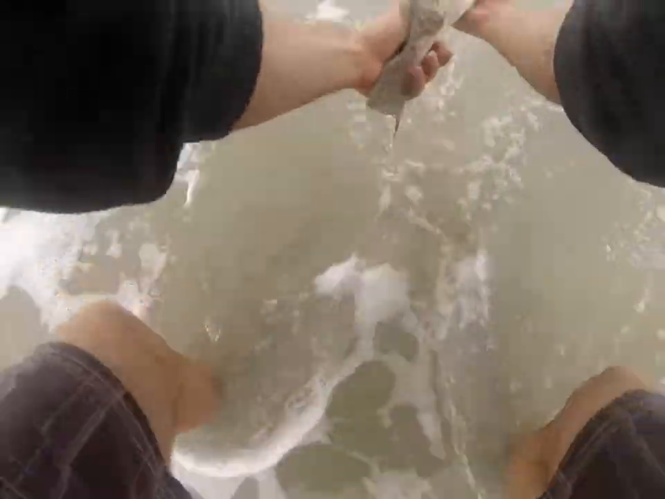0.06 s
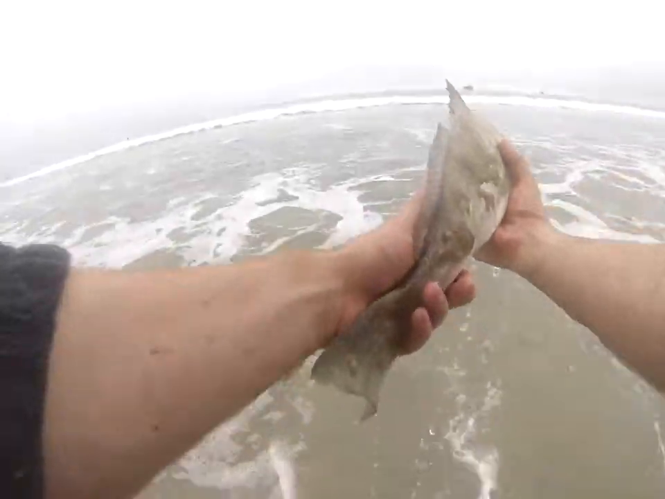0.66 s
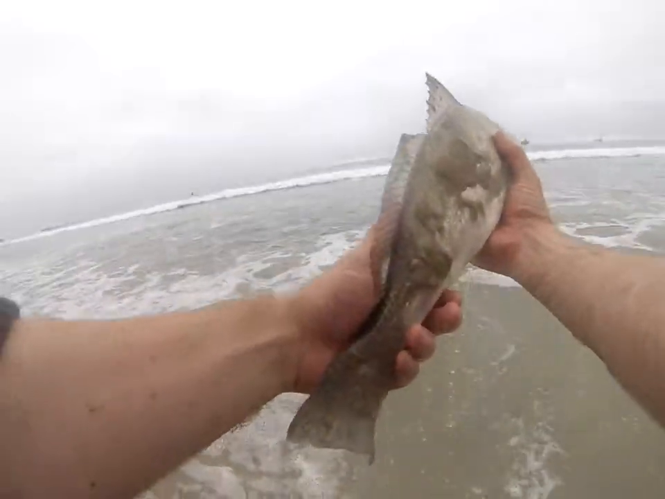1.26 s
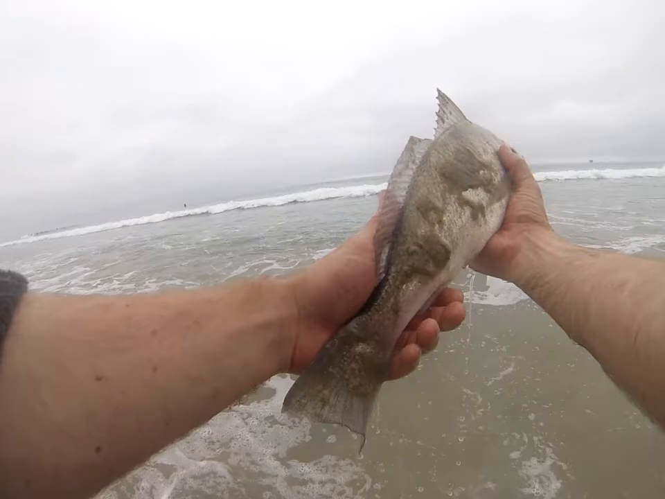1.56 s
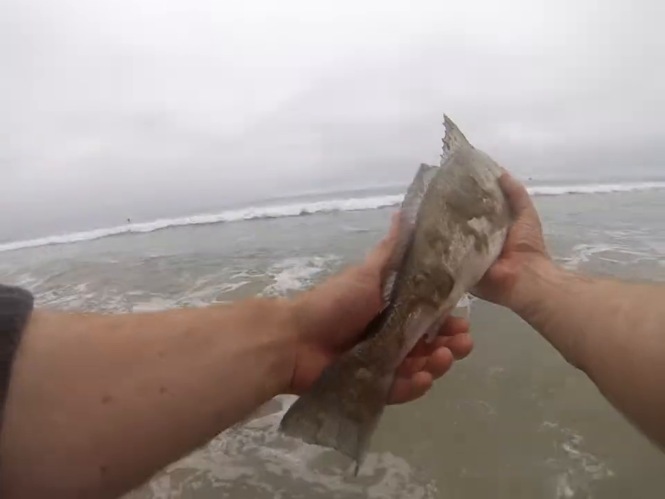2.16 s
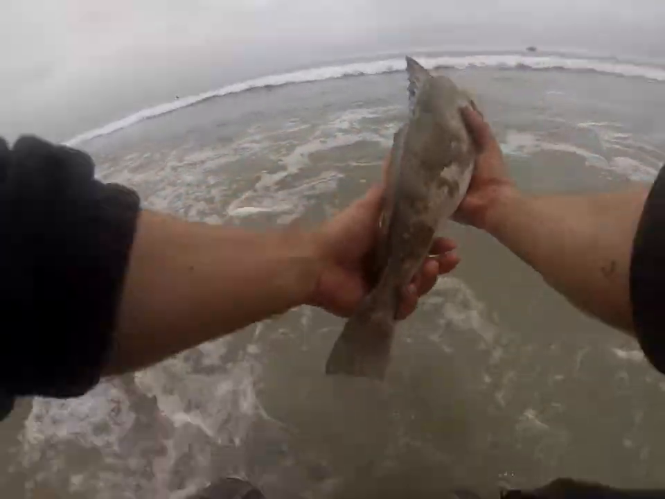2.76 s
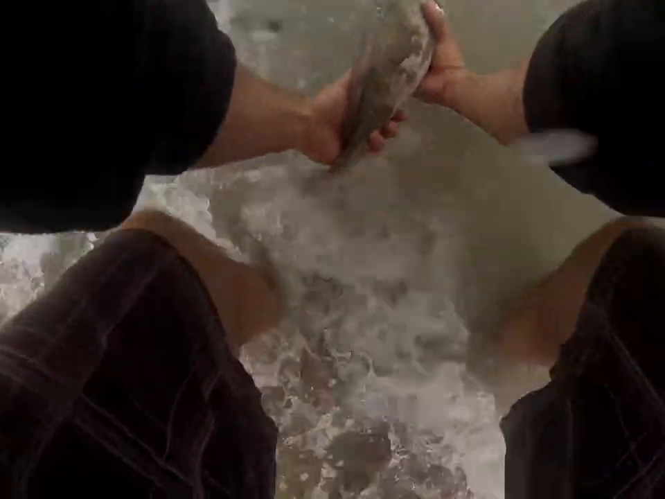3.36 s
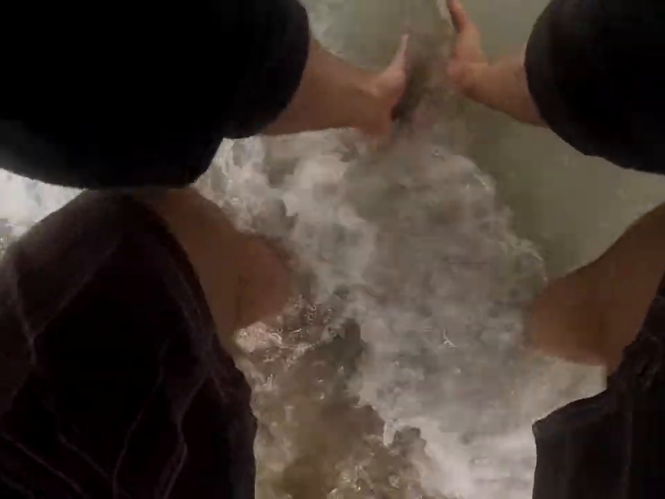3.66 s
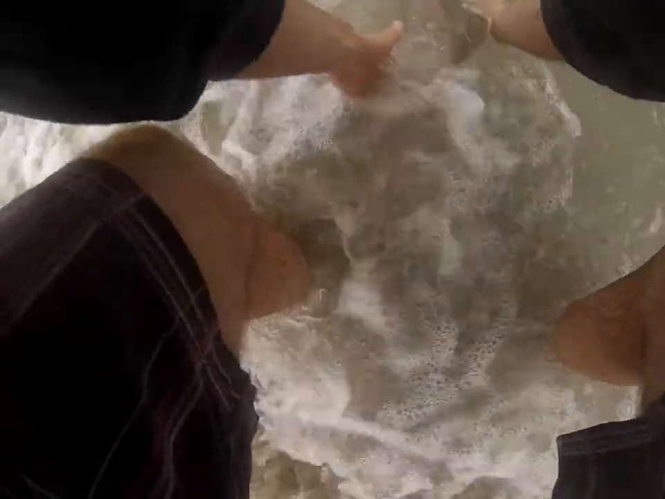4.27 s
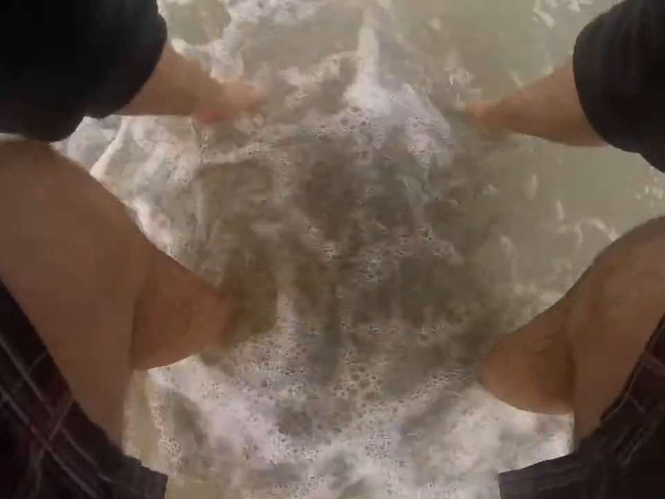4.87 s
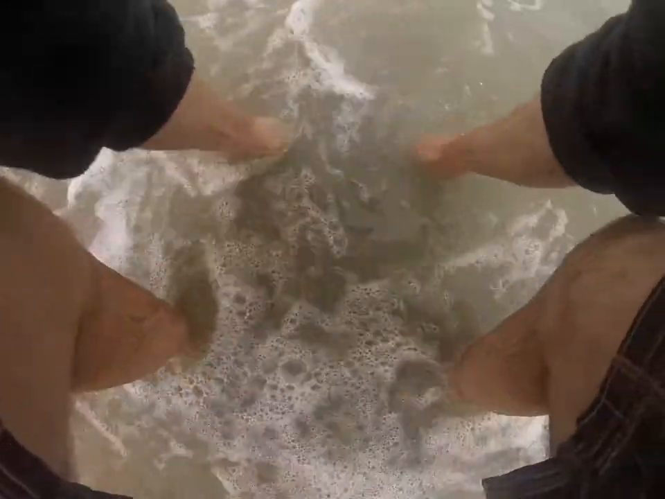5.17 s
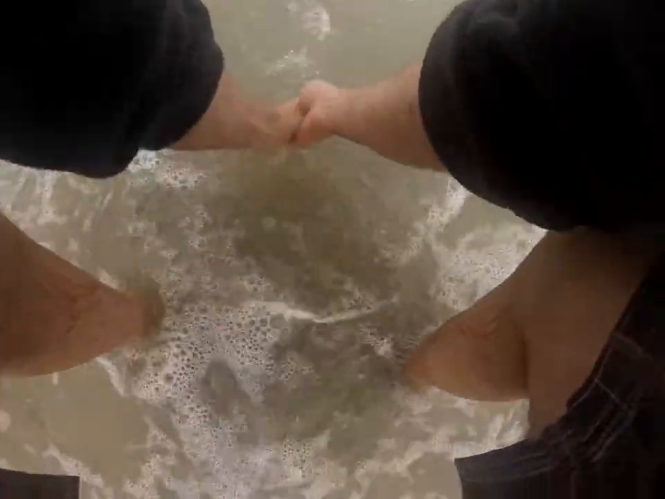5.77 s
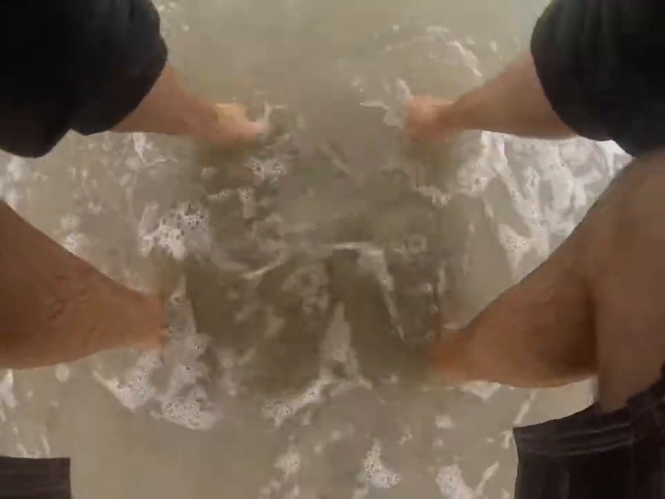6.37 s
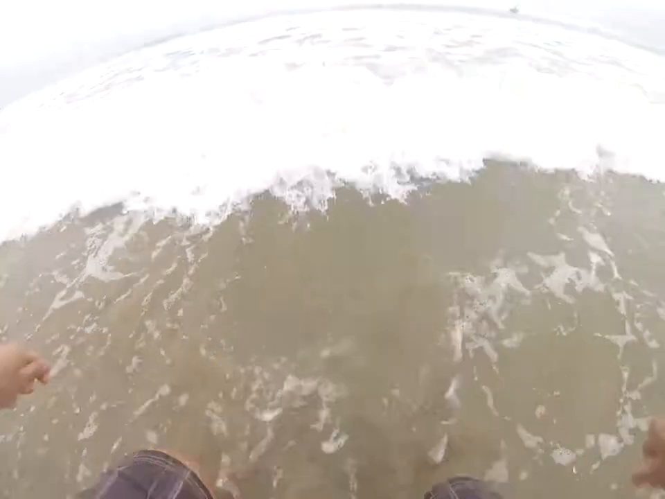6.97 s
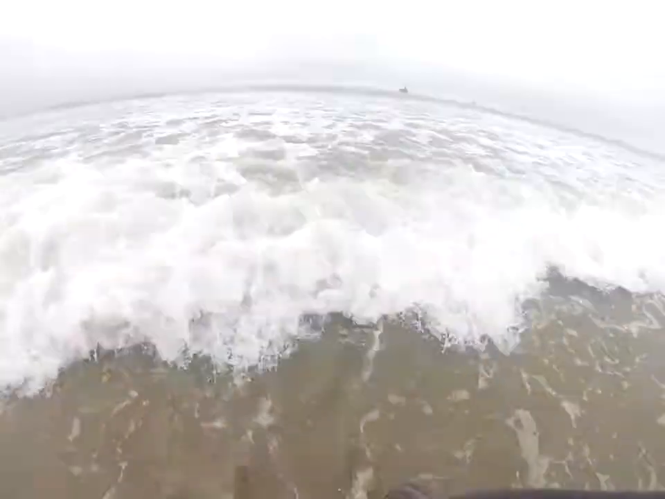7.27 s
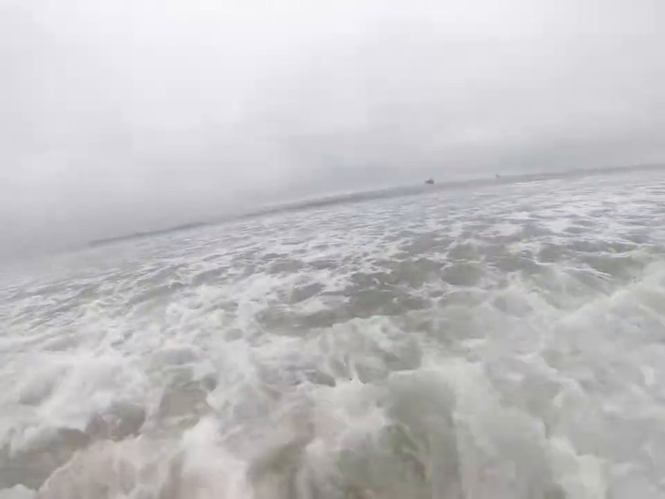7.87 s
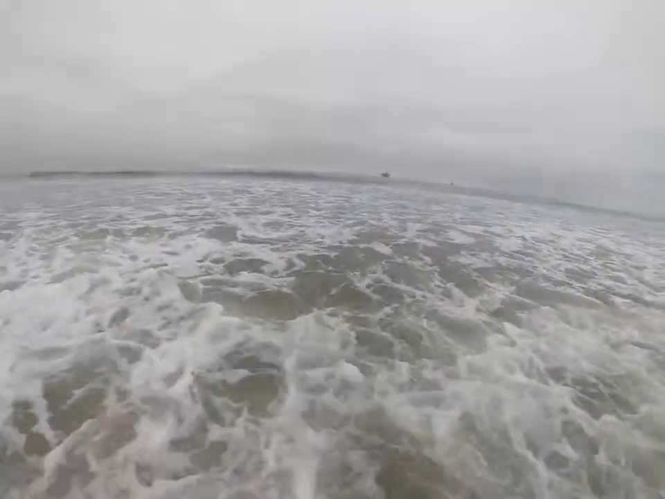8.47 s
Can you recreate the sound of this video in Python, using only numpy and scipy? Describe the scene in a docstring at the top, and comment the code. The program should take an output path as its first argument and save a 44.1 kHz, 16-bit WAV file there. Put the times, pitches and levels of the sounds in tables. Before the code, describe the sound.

A chest-worn camera clicks and thumps in its mount over the soft rush of shallow surf. The water swells into bubbling, hissing foam, then eases, with light drips from wet hands. Another sharp click starts a run of dull knocks and low strap rubbing as a nearby wave tumbles in with a roar and fizz. Everything sounds close and slightly boxy through the plastic housing.

```python
"""Shallow surf, heard by a wader through a chest-strapped camera in a waterproof plastic case.
Far breakers roar; a wave foams round the legs, the wader stoops, a second wave breaks close by.
Water is bubble clouds over rushing noise, its foam and fizz coloured by the case; drops ring as bubbles.
As the body bends, the mount slips and clicks, the straps rub, and the case rattles and thumps."""
import sys
import numpy as np
from scipy import signal
from scipy.fft import rfft, irfft
from scipy.io import wavfile
from scipy.ndimage import uniform_filter1d

SR = 44100
rng = np.random.default_rng(int(sys.argv[2]) if len(sys.argv) > 2 else 0)


def dump_mix(stems):
    """Bounce the given channels to the path in sys.argv[1] as a 16-bit WAV at rate SR."""
    frames = np.atleast_2d(stems).T  # one column per channel
    limited = np.clip(frames, -1, 1)  # hard clip at full scale
    pcm = np.round(limited * 32767).astype(np.int16)
    wavfile.write(sys.argv[1], SR, pcm)


N = 380141
T = np.arange(N) / SR
FREQS_HZ = np.arange(N // 2 + 1) * SR / N

# waves at the legs: arrival/s, rise/s, hold/s, ebb/s, foam/dB, fizz/dB, churn/dB
SURF_WAVES = [(0, .3, 0.36, 0.98, -56.5, -84, -60), (2.748, .4, 0.46, 0.47, -54.5, -62, -58.5),
              (3.4, .5, .55, 0.62, -44, -50.8, -52.5), (4.373, .28, 0.11, .33, -48.5, -54.5, -59.5),
              (5.183, 0.59, 2.3, 0.7, -55, -58, -61.5), (7.354, 0.68, 0.54, 0.36, -45, -50.5, -58)]
# water spectra: f/Hz, level/dB
CHURN_SPECTRUM = [(60, -32), (150, -8), (320, 1), (480, -2), (720, -7), (1000, -8.5), (1400, -5.5),
                  (3000, -37)]
FOAM_SPECTRUM = [(500, -4), (1000, -1.5), (1400, 1), (2000, 4.5), (3000, -1), (3800, -8.5), (5000, -35),
                 (9000, -45)]
FIZZ_SPECTRUM = [(2000, -14.5), (3500, 2), (4600, 3), (6200, -1.5), (8000, -4.5), (9200, -6), (12500, -9),
                 (15500, -17)]
ROAR_SPECTRUM = [(200, -30), (550, -4), (900, -4), (1270, 5.5), (1500, -9), (2000, -30), (4000, -44)]
# resonances: f/Hz, width/Hz, lift/dB
CASE_PEAKS = [(1290, 71, 5.5), (1560, 285, 10), (2100, 160, 0), (2244, 336, 11.5), (2628, 213, 9.5),
              (3033, 250, 5), (3470, 290, 6.5), (4055, 340, 5), (4820, 170, 4.5), (5290, 650, 6.5),
              (7250, 1830, 5.5), (11300, 1500, 2)]  # air and walls of the case
NEAR_PEAKS = [(1530, 380, 3), (2030, 260, -2.5), (3060, 410, 7), (4060, 270, 3.5), (7500, 1800, 3)]  # brighter foam at the legs
HOLLOW_PEAKS = [(400, 190, 3.5), (1564, 360, 4.5), (4920, 180, 7.5), (5400, 400, -0.5), (6000, 480, 4.5),
                (7650, 650, -2), (8560, 1350, 5.5), (10300, 800, -2)]  # hollow between chest, arms and water
# lean over the water: t/s, share/0-1
STOOP_SHARE = [(4.35, 0), (4.65, 1), (6.65, 1), (6.9, 0)]
# drops into the sea: t/s, f/Hz, level/dB, t60/s
SEA_PLOPS = [(0.002, 1450, -35, 0.12), (0.022, 1320, -38, 0.074), (0.035, 1500, -37, 0.054),
             (0.853, 1265, -45, 0.15)]
# drips from the hands: t/s, level/dB, f/Hz
HAND_DRIPS = [(3.534, -30, 3630), (3.877, -41, 8800), (3.989, -36, 5140), (4.455, -31, 2400),
              (5.371, -33, 2264), (5.912, -38, 6540), (5.934, -31, 2340), (6.16, -29.5, 2260),
              (6.166, -38, 6800), (6.168, -44, 12000), (6.188, -30, 3400), (6.191, -26.5, 2480)]
# mount slips a notch: t/s, level/dB, hardness/0-1
SLIPS = [(0.0493, -18, 0.46), (.087, -39, 0.4), (.125, -35.5, 0.4), (0.1645, -33.5, 0.45), (.204, -34, .22),
         (0.2941, -31, 0.38), (.341, -34.5, .45), (0.4047, -37.5, 0.47), (.586, -33.5, 0.7),
         (.615, -32, 0.5), (.6424, -34, 0.8), (.676, -37, 0.77), (0.7305, -24.5, 0), (2.7968, -39, 0.8),
         (2.8349, -32.5, 0.36), (2.8827, -41, .35), (3.2216, -35.5, 0.3), (6.785, -29.5, 0.23),
         (6.827, -18, .5), (6.8535, -32.5, .42), (6.8867, -32, .22), (7.1919, -35.5, 0.34),
         (7.3257, -28, 0.47), (7.7997, -34.5, 0.46)]
# case modes: f/Hz, decay/s, level/dB
SIDE_MODES = [(597, 0.003, -47), (860, 0.0032, -32), (1075, 0.0024, -30), (1298, 0.0018, -15.5),
              (1474, 0.0015, -14.5), (2595, 0.0018, -22.5), (3093, 0.0013, -20), (3900, 0.0013, -31.5)]  # beside the main mode
EDGE_MODES = [(6930, 0.00028, 5.5), (7400, 0.00053, 7), (7300, 0.00075, -9.5), (9630, 0.00043, -6),
              (10800, 0.00055, -9), (12300, .0003, -2.5)]  # sharp edge of a slip
THUMP_MODES = [(64, 0.0093, -7.5), (97, 0.012, 2), (124, 0.004, 3.5)]  # case on its strap, low
KNOCK_MODES = [(217.6, 0.00594, 5.5), (302, 0.0032, 5.5), (420, 0.003, -11.5), (559, 0.0036, -7)]  # case on its strap, mid
# handling spectra: f/Hz, level/dB
CRACK_SPECTRUM = [(200, 2), (450, -18), (750, -50), (1200, 2), (2400, 18), (3400, -9), (4400, -2),
                  (6000, -9.5), (15000, -57)]
RUB_SPECTRUM = [(25, -10), (60, 1), (85, -5.5), (102, 2.5), (135, -10), (175, -11), (225, -7.5), (300, -16),
                (500, -33.5), (1000, -62.5)]
SWAY_SPECTRUM = [(3, 4.5), (10, 12), (20, 3.5), (40, -4), (70, -19.5), (150, -62)]
# body pulls at the straps: t/s, length/s, rub/dB
BODY_MOVES = [(0.102, 0.57, -47.5), (0.894, .27, -54.5), (2.686, 0.22, -46.5), (3.137, 0.055, -41.5),
              (3.7, 3, -53.5), (5.73, .1, -48.5), (6.783, 0.18, -42), (7.195, 0.24, -39.5),
              (7.704, 0.12, -41.5), (8.04, 0.37, -58)]
# case hits the chest: t/s, thump/dB, knock/dB, knock tilt/(dB/octave)
CHEST_BUMPS = [(0.222, -30, -48, 0), (.269, -24.5, -44, 4), (.492, -24, -36, 4), (.702, -32, -22.5, 3.5),
               (0.7347, -13, -21, -7), (1.264, -38.5, -57, 0), (3.0, -33, -29, -6), (6.925, -27, -44, -2),
               (7.022, -29.5, -35, 7), (7.172, -17, -26.5, -5), (7.238, -22.5, -29, 0),
               (7.332, -18, -29, -2), (7.36, -21.5, -43.5, 2), (7.407, -27, -27.5, 1),
               (7.453, -20.5, -25, 0), (7.458, -21.5, -27.5, 1), (7.705, -19, -25.5, -1),
               (7.841, -26, -45, 0), (7.944, -30.5, -56, 0)]

CALM_FOAM_DB, CALM_FIZZ_DB, CALM_CHURN_DB = -53, -61.5, -61
SPRAY_LOW_HZ, SPRAY_HIGH_HZ = 2600, 7500
SOFT_SLIP_HZ, HARD_SLIP_HZ = 2092, 2404  # main case mode at hardness 0 and 1
SNAP_ATTACK_S, SNAP_DECAY_S = 0.00043, 0.0047
STRAP_DETUNE = 0.035
REST_RUB_DB, HISS_DB, TOP_HZ = -58, -71.5, 15350


def undb(db):
    """Decibels to gain."""
    return 10 ** (np.asarray(db) / 20)


def unit(x):
    """Scale to rms 1."""
    return x / np.sqrt(np.mean(x ** 2))


def colour(x, spectrum):
    """Filter x by a smooth spectrum; rms 1."""
    hz, db = np.transpose(spectrum)
    gain = undb(np.interp(np.log(FREQS_HZ + 1), np.log(hz), db))
    return unit(irfft(rfft(x) * gain, N))


def resonate(x, peaks):
    """Filter x by one bell per resonance."""
    db = sum(lift_db * 2 ** -(2 * (FREQS_HZ - hz) / width_hz) ** 2 for hz, width_hz, lift_db in peaks)
    return irfft(rfft(x) * undb(db), N)


def walk(rate_hz):
    """Smooth random wander; rms 1."""
    step = int(SR / rate_hz)
    stairs = np.repeat(rng.standard_normal(N // step + 1), step)
    return unit(uniform_filter1d(stairs, step)[:N])


def envelope(at_s, rise_s, hold_s, ebb_s):
    """Gaussian rise until at_s; exponential ebb from at_s + hold_s."""
    return np.exp(-(np.minimum(T - at_s, 0) / rise_s) ** 2 - np.maximum(T - at_s - hold_s, 0) / ebb_s)


def scatter(per_s, level_db, spread_db):
    """Random events round a level curve: t/s, level/dB, size/0-1."""
    draws = rng.random((int(per_s * N / SR), 3))
    return [(when * N / SR, level_db[int(when * N)] + spread_db * (2 * strength - 1), size)
            for when, strength, size in draws]


def add(track, at_s, sound):
    """Mix sound into track."""
    i = max(int(at_s * SR), 0)
    track[i:i + len(sound)] += sound[:max(N - i, 0)]


def bubble(hz, t60_s, rise):
    """Ringing bubble; pitch climbs as it nears the surface."""
    t = T[:int(t60_s * SR) + 2]
    return np.exp(-np.log(1000) * t / t60_s) * np.sin(2 * np.pi * hz * t * (1 + rise * t / t60_s / 2))


def bubbles(low_hz, high_hz, per_s, cycles, spread_db, sizes=20):
    """Cloud of bubbles, most faint, a few strong; even spectrum, rms 1."""
    out = np.zeros(N)
    for hz in np.geomspace(low_hz, high_hz, sizes):
        when, rank = rng.random((int(per_s * N / SR / sizes), 2)).T
        births = np.zeros(N)
        births[(when * N).astype(int)] = undb(-spread_db * np.log(np.maximum(rank, 0.01)))
        out += hz * signal.oaconvolve(births, bubble(hz, cycles / hz, rise=0.2))[:N]
    return unit(out)


def surf_levels_db():
    """Foam, fizz and churn: each wave adds its power to the calm sea."""
    power = undb([CALM_FOAM_DB, CALM_FIZZ_DB, CALM_CHURN_DB])[:, None] ** 2
    for at_s, rise_s, hold_s, ebb_s, *levels_db in SURF_WAVES:
        power = power + np.outer(undb(levels_db), envelope(at_s, rise_s, hold_s, ebb_s)) ** 2
    return 10 * np.log10(power)


def surf(foam_db, fizz_db, churn_db):
    """Churn, foam and fizz: bubbles over a rush; single bubbles stand out as the foam nears."""
    near = np.clip(undb(foam_db + 41.5), 0, 1)
    surge = walk(12)
    churn = rng.standard_normal(N) + 0.15 * near * bubbles(325, 930, 250, cycles=14, spread_db=3)
    foam = rng.standard_normal(N) + 0.53 * near * bubbles(1015, 4490, 1600, cycles=21, spread_db=2.5)
    fizz = rng.standard_normal(N) + 0.69 * near * bubbles(3450, 14300, 2500, cycles=11, spread_db=4)
    churn = colour(churn, CHURN_SPECTRUM) * undb(churn_db + 3 + 1.3 * surge)
    foam = unit(resonate(colour(foam, FOAM_SPECTRUM), CASE_PEAKS))
    foam *= undb(foam_db - 0.83 + 0.42 * surge + 0.5 * walk(30))
    fizz = unit(resonate(colour(fizz, FIZZ_SPECTRUM), CASE_PEAKS))
    fizz *= undb(fizz_db - 2.32 + surge + 0.25 * walk(40))
    sea = churn + foam + fizz
    sea = (1 - near ** 2) * sea + near ** 2 * resonate(sea, NEAR_PEAKS)
    stoop = np.interp(T, *np.transpose(STOOP_SHARE))
    return (1 - stoop) * sea + stoop * resonate(sea, HOLLOW_PEAKS)


def drops(fizz_db):
    """Round plops; drips and stray spray, each a tiny bubble in a puff of hiss."""
    out = np.zeros(N)
    for at_s, hz, db, t60_s in SEA_PLOPS:
        add(out, at_s, undb(db) * bubble(hz, t60_s, rise=0.21))
    t = T[:SR // 30]
    puff = t / 0.0019 * np.exp(1 - t / 0.0027)
    spray = [(at_s, db, SPRAY_HIGH_HZ * (SPRAY_LOW_HZ / SPRAY_HIGH_HZ) ** size)
             for at_s, db, size in scatter(per_s=7.8, level_db=fizz_db + 3.5, spread_db=10)]
    for at_s, db, hz in HAND_DRIPS + spray:
        band = signal.butter(2, [hz * 0.77, hz * 1.62], "band", fs=SR, output="sos")
        hiss = unit(signal.sosfilt(band, rng.standard_normal(len(t))))
        add(out, at_s, undb(db - 20.5) * puff * hiss)
        add(out, at_s, undb(db) * bubble(hz, t60_s=0.011, rise=0.11))
    return out


def strike(modes, swell, detune):
    """One blow: randomly detuned modes swell briefly and decay; peak 1."""
    t = T[:SR // 8]
    ring = np.zeros(len(t))
    for hz, decay_s, db in modes:
        tuned_hz = hz * (1 + detune * rng.standard_normal())
        shape = (t / decay_s) ** swell * np.exp(-t / decay_s)
        ring += undb(db) * shape * np.sin(2 * np.pi * tuned_hz * t)
    return ring / np.abs(ring).max()


def mount_slips():
    """Each slip cracks, rings the case and rocks it; harder slips ring higher and sharper."""
    out, snap = np.zeros(N), np.zeros(N)
    t = T[:SR // 20]
    snap_shape = (1 - np.exp(-t / SNAP_ATTACK_S)) * np.exp(-t / SNAP_DECAY_S)
    for at_s, db, hardness in SLIPS:
        main_hz = SOFT_SLIP_HZ + (HARD_SLIP_HZ - SOFT_SLIP_HZ) * hardness
        sides = [(hz, decay_s, side_db + 2.5 * (1 - hardness)) for hz, decay_s, side_db in SIDE_MODES]
        ring = strike([(main_hz, 0.0009, 0), *sides], swell=1.79, detune=0.016)
        add(snap, at_s, undb(db - 6.5) * snap_shape)
        add(out, at_s - 0.0003, undb(db + 8) * ring)
        add(out, at_s - 0.0002, undb(db) * hardness * strike(EDGE_MODES, swell=1.63, detune=0.024))
        # the heavy case lags the slip
        rock_db = -18.5 + 0.28 * db
        add(out, at_s + 0.0018, -undb(rock_db) * strike(THUMP_MODES, swell=0.3, detune=STRAP_DETUNE))
        add(out, at_s + 0.0026, -undb(rock_db - 5) * strike(KNOCK_MODES, swell=0.52, detune=0.046))
    return out + snap * colour(rng.standard_normal(N), CRACK_SPECTRUM)


def rub_level_db():
    """Each move adds its power to a body never quite still."""
    power = sum((undb(db) * envelope(at_s, rise_s=0.073, hold_s=length_s, ebb_s=0.14)) ** 2
                for at_s, length_s, db in BODY_MOVES)
    return 10 * np.log10(power + undb(REST_RUB_DB) ** 2)


def straps(rub_db):
    """The harness rubs in uneven jerks; the camera sways with the body."""
    jerks = rng.standard_normal(N) * undb(1.94 * walk(35))
    rub = colour(jerks, RUB_SPECTRUM) * undb(rub_db)
    sway = colour(rng.standard_normal(N), SWAY_SPECTRUM) * undb(0.43 * rub_db - 23)
    return rub + sway


def case_rattle(rub_db):
    """The loose case ticks in its mount, as hard as the straps pull."""
    ticks = np.zeros(N)
    for at_s, db, _ in scatter(per_s=30, level_db=rub_db + 3.5, spread_db=3):
        ticks[int(at_s * SR)] = undb(db)
    return signal.oaconvolve(ticks, strike(SIDE_MODES, swell=1.63, detune=0.01))[:N]


def case_bumps(rub_db):
    """The case thumps and knocks on the chest, and jostles softly as the body moves."""
    out = np.zeros(N)
    for at_s, thump_db, knock_db, tilt_db_per_octave in CHEST_BUMPS:
        modes = [(hz, decay_s, db + tilt_db_per_octave * np.log2(hz / KNOCK_MODES[0][0]))
                 for hz, decay_s, db in KNOCK_MODES]
        add(out, at_s + 0.00093, undb(thump_db) * strike(THUMP_MODES, swell=0.58, detune=STRAP_DETUNE))
        add(out, at_s + 0.00094, undb(knock_db) * strike(modes, swell=0.56, detune=0.11))
    for at_s, db, _ in scatter(per_s=5, level_db=rub_db + 9.5, spread_db=3.5):
        add(out, at_s, undb(db) * strike(THUMP_MODES, swell=0.73, detune=STRAP_DETUNE))
    return out


def breaker():
    """Tumbling wave front: large trapped bubbles in an uneven roar."""
    tumble = rng.standard_normal(N) + 0.26 * bubbles(386, 1520, per_s=500, cycles=14, spread_db=1.5)
    roar = colour(tumble, ROAR_SPECTRUM) * undb(-50.5 + 1.1 * walk(12))
    return roar * envelope(at_s=7.5, rise_s=0.37, hold_s=-0.12, ebb_s=0.7)


def scene():
    """Water, handling noise and steady microphone hiss; mono."""
    foam_db, fizz_db, churn_db = surf_levels_db()
    rub_db = rub_level_db()
    hiss = undb(HISS_DB) * rng.standard_normal(N)
    sea = surf(foam_db, fizz_db, churn_db) + drops(fizz_db) + breaker()
    handling = mount_slips() + straps(rub_db) + case_rattle(rub_db) + case_bumps(rub_db)
    return (sea + handling + hiss)[None]


def record(dry):
    """The camera cuts the top treble."""
    return signal.sosfilt(signal.ellip(12, 0.2, 70, TOP_HZ, fs=SR, output="sos"), dry)


dry = scene()
out = record(dry)
dump_mix(out)
```